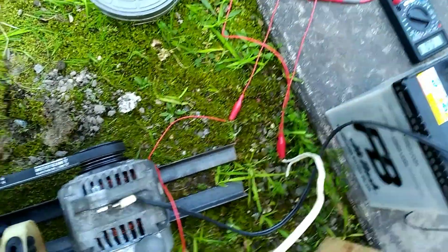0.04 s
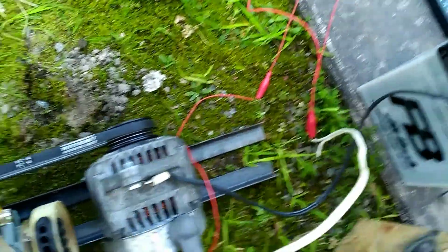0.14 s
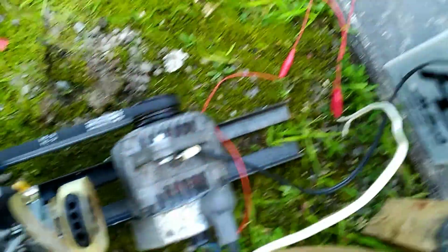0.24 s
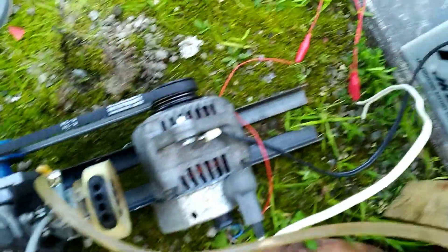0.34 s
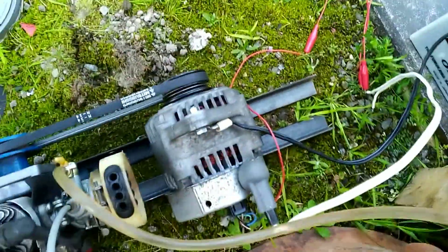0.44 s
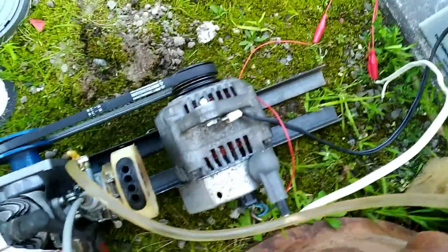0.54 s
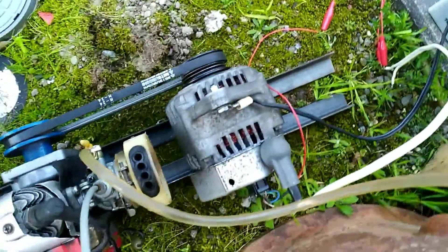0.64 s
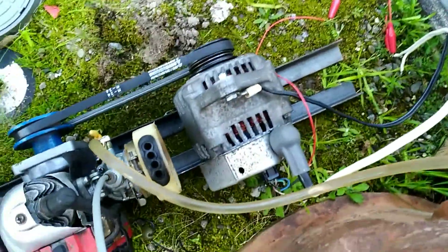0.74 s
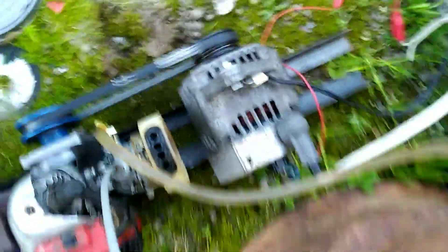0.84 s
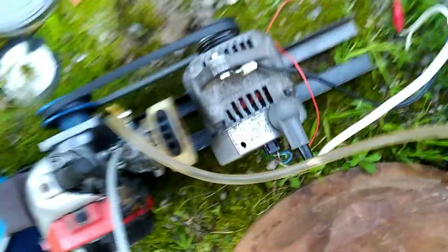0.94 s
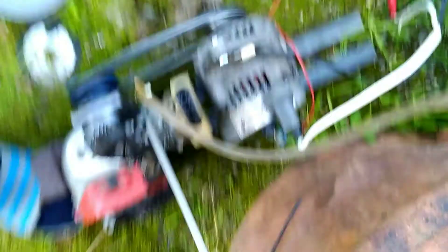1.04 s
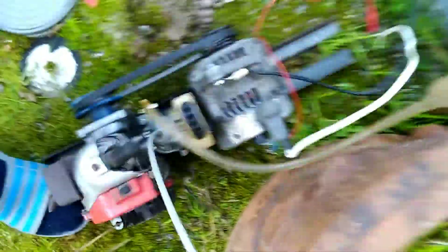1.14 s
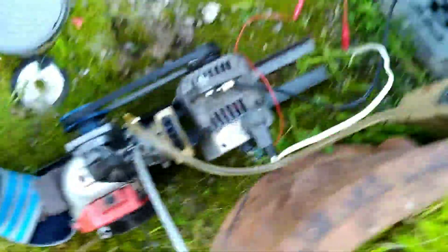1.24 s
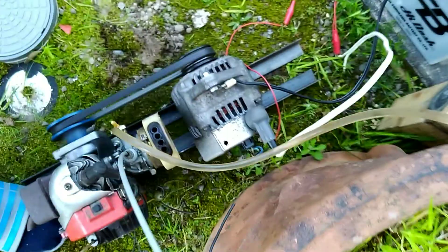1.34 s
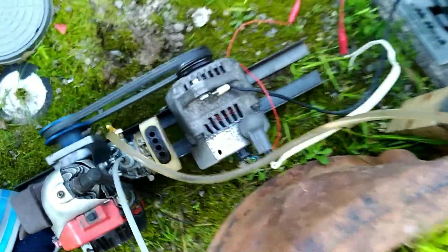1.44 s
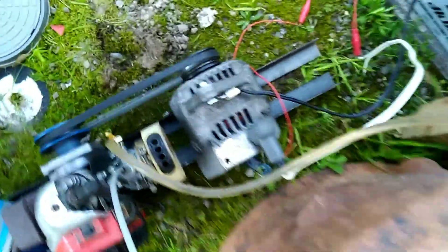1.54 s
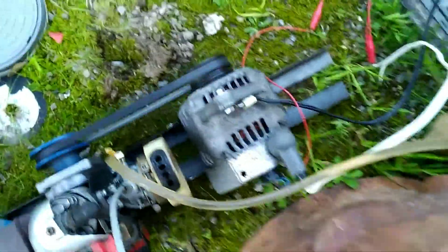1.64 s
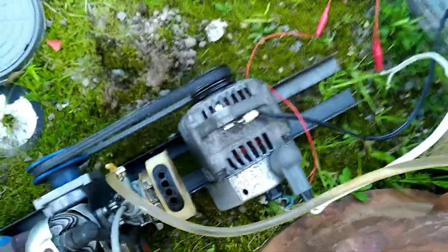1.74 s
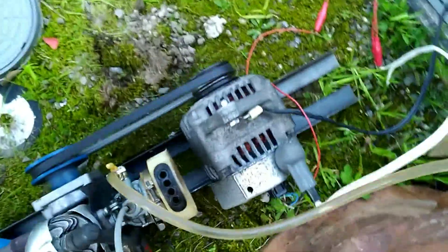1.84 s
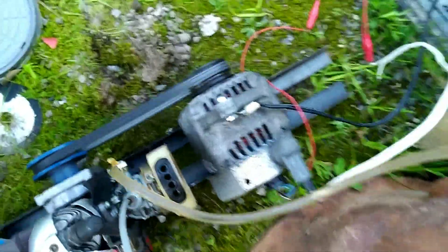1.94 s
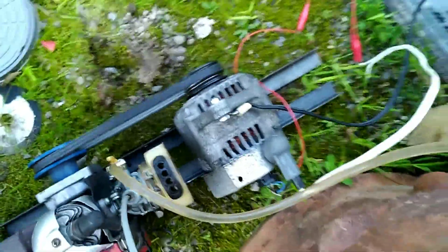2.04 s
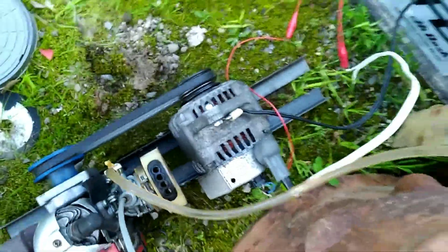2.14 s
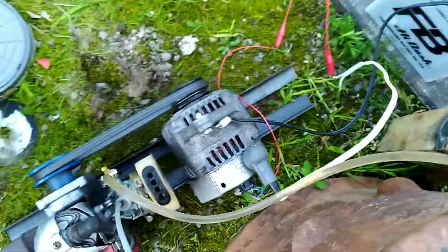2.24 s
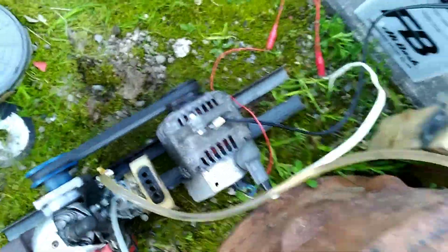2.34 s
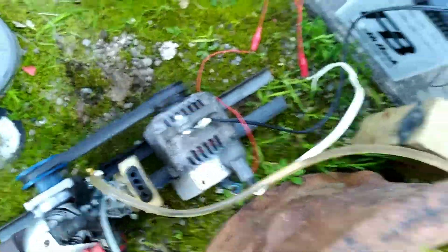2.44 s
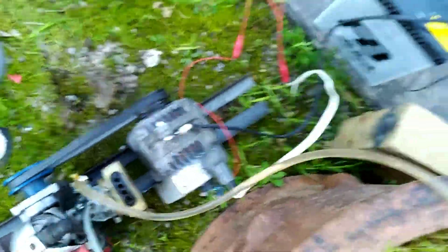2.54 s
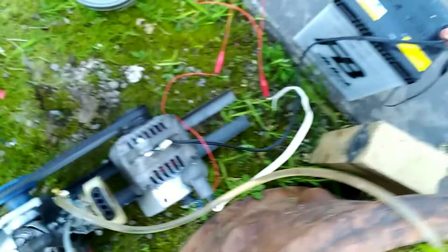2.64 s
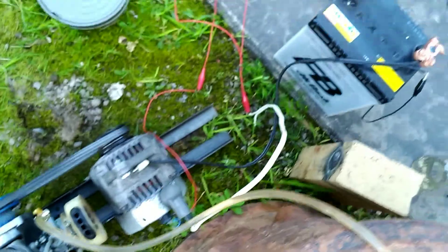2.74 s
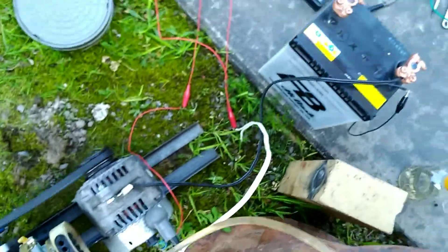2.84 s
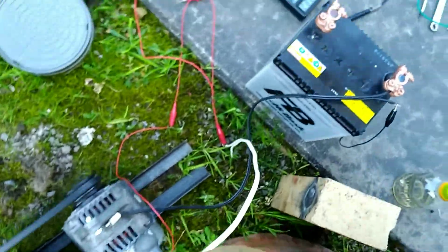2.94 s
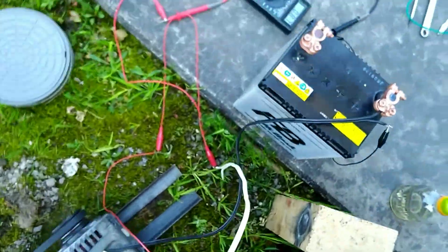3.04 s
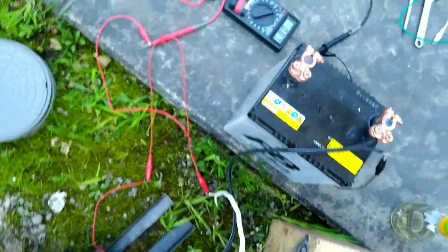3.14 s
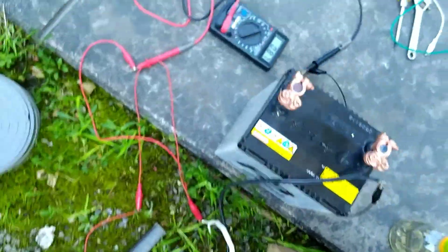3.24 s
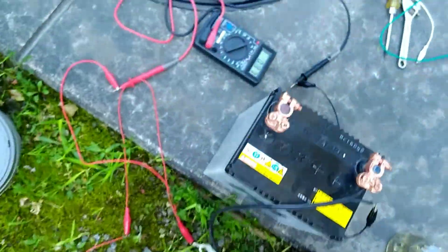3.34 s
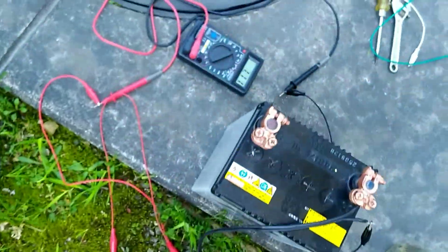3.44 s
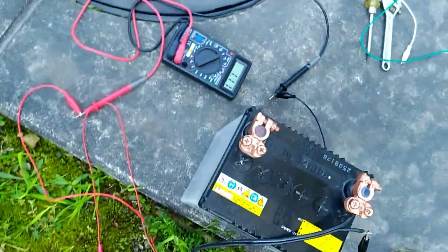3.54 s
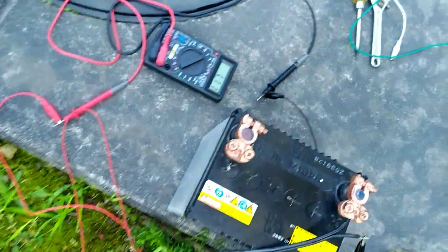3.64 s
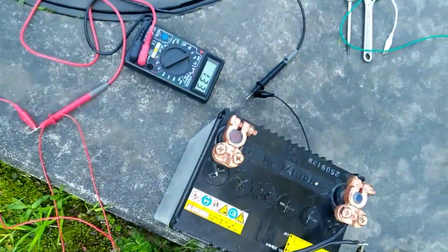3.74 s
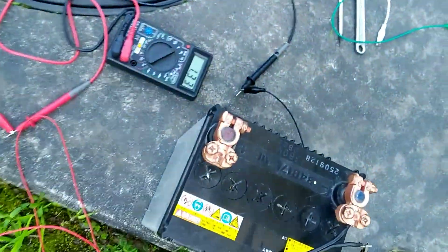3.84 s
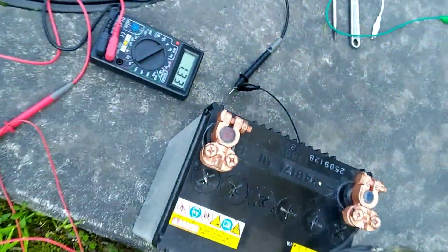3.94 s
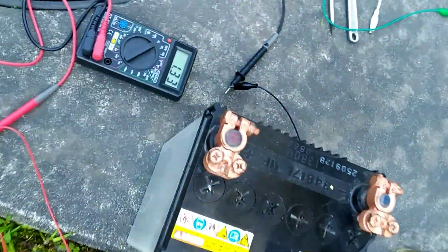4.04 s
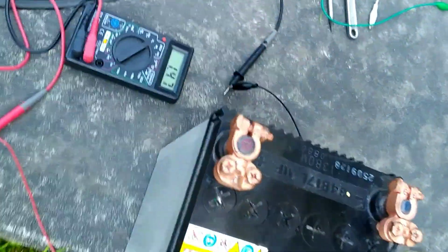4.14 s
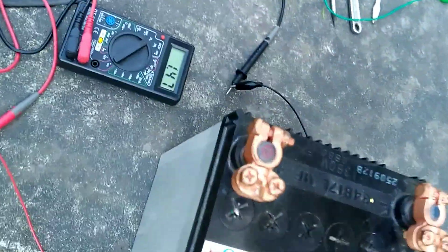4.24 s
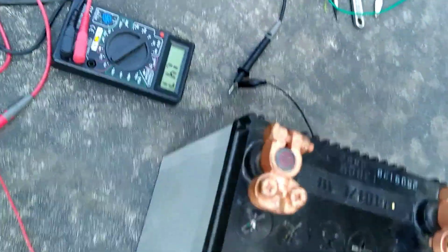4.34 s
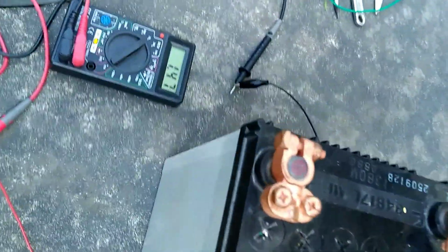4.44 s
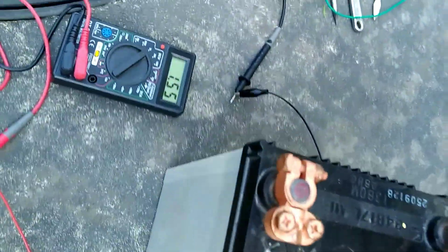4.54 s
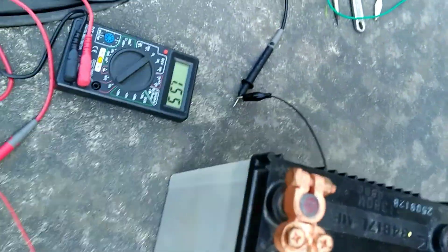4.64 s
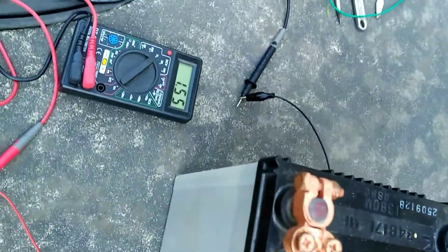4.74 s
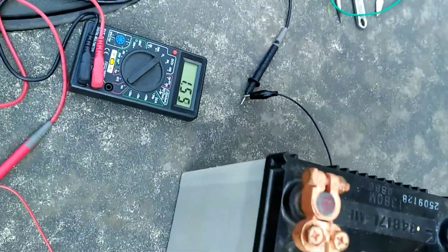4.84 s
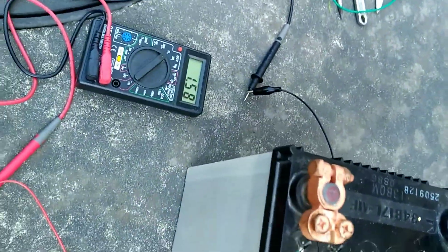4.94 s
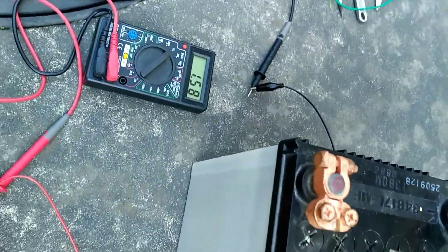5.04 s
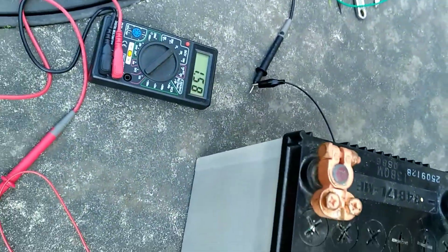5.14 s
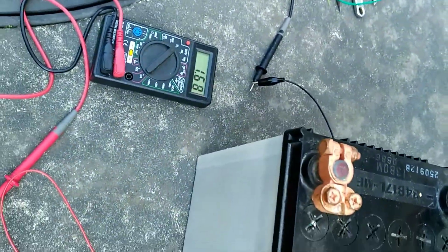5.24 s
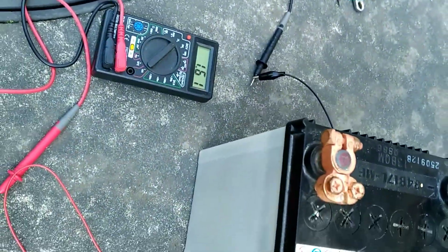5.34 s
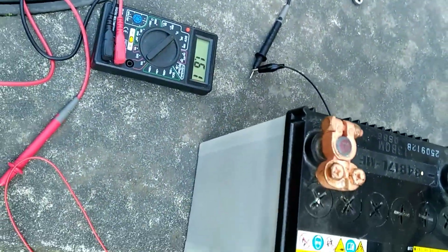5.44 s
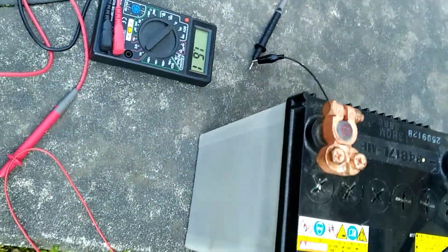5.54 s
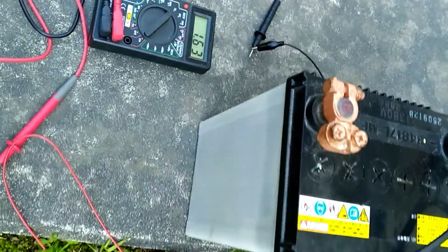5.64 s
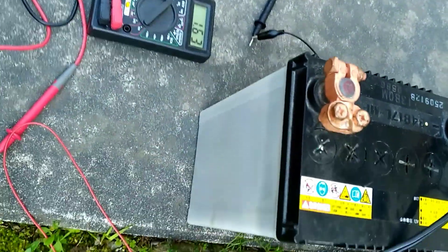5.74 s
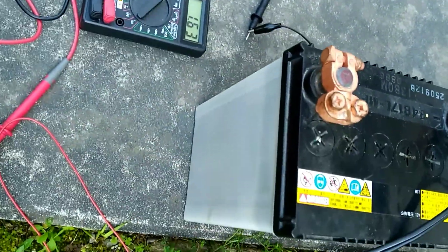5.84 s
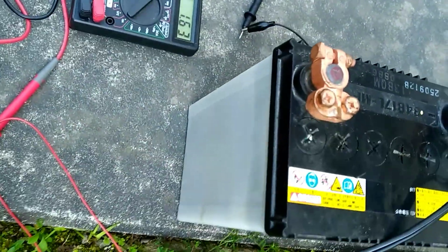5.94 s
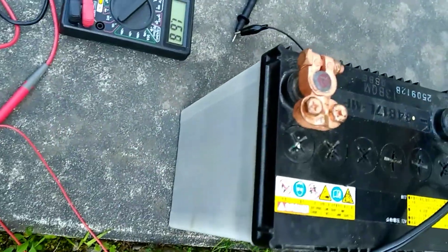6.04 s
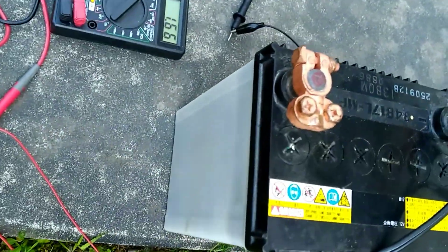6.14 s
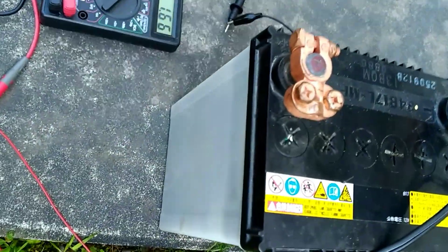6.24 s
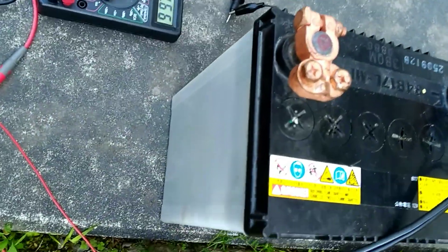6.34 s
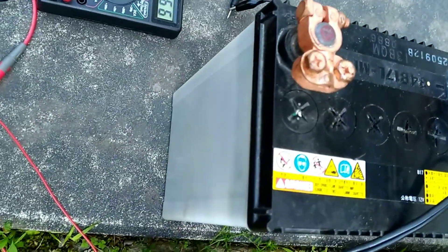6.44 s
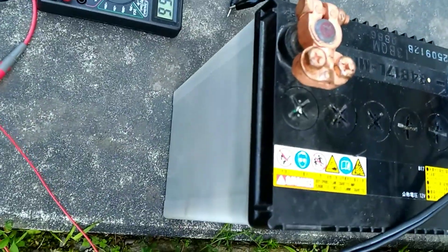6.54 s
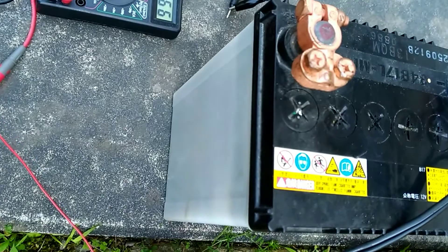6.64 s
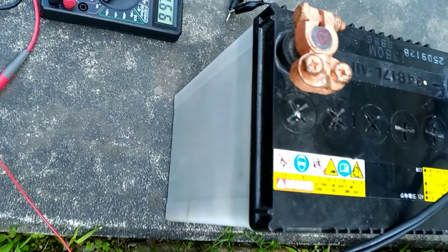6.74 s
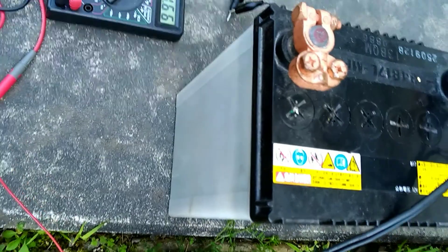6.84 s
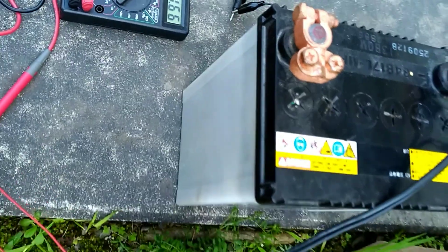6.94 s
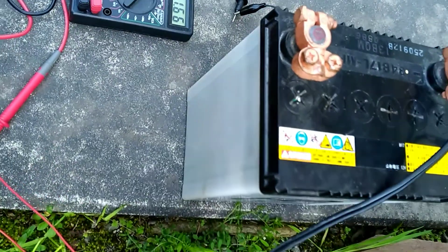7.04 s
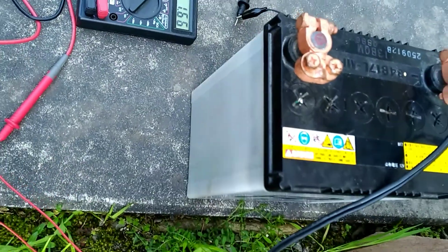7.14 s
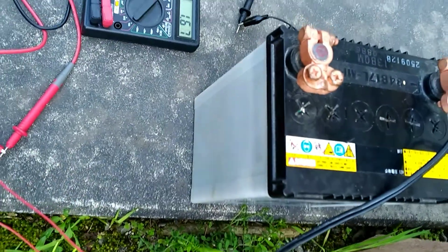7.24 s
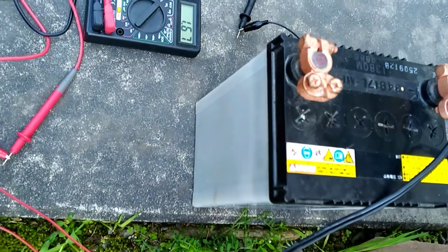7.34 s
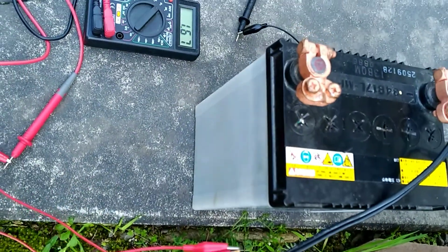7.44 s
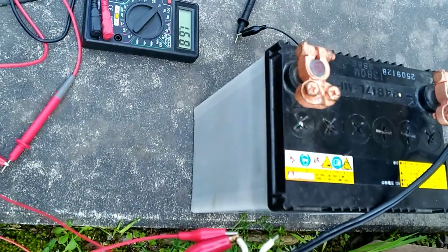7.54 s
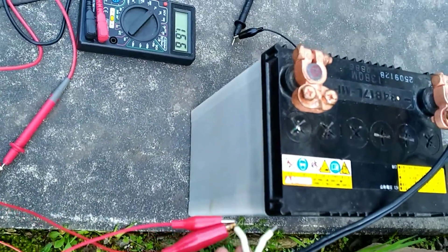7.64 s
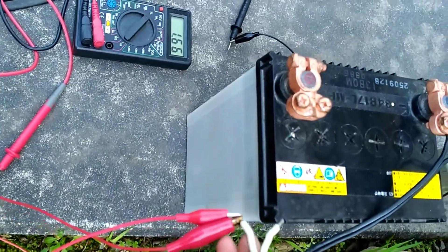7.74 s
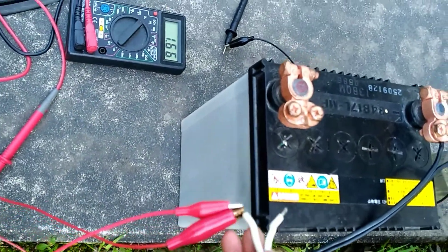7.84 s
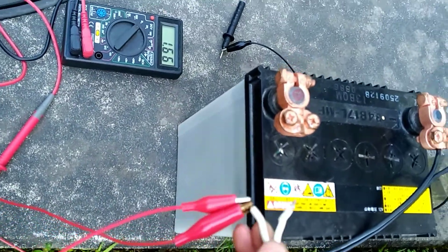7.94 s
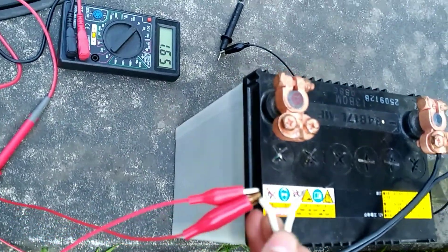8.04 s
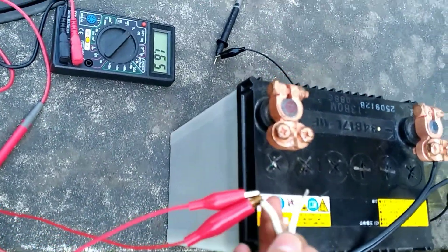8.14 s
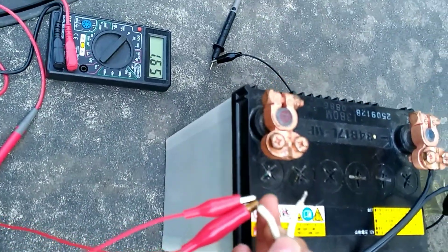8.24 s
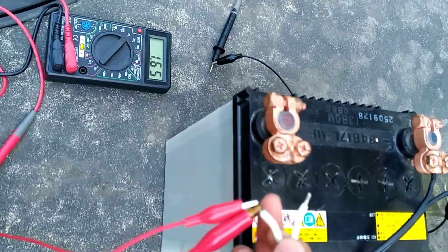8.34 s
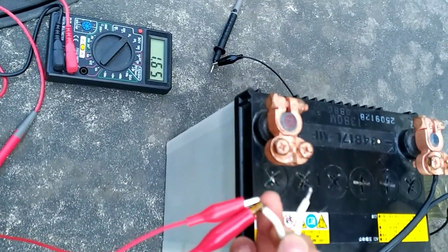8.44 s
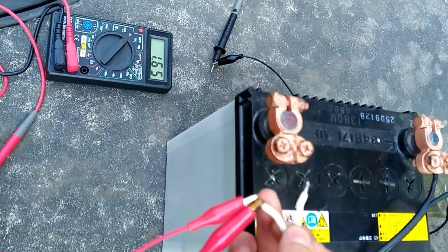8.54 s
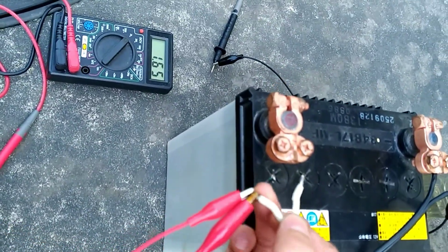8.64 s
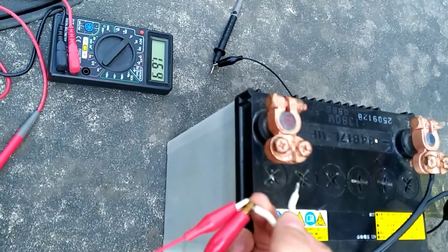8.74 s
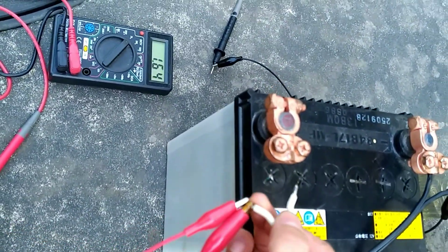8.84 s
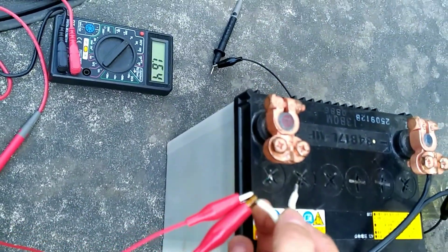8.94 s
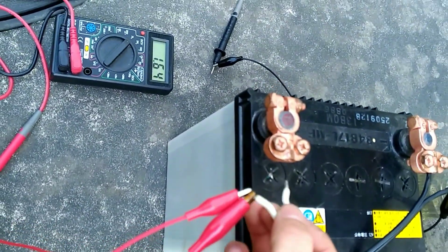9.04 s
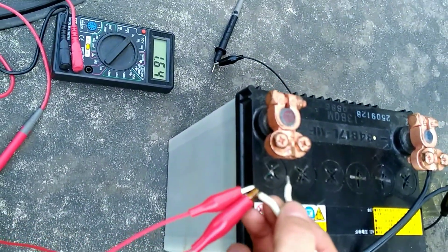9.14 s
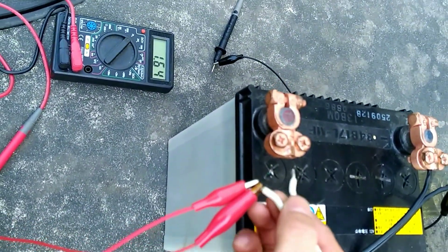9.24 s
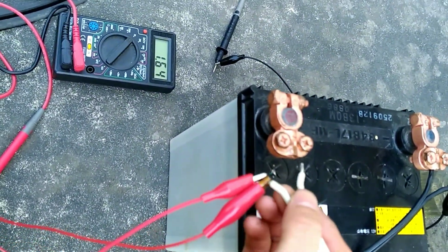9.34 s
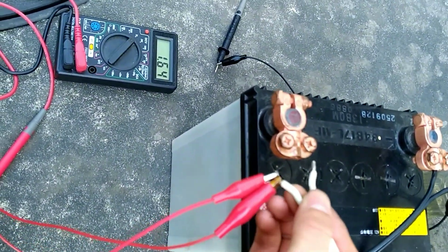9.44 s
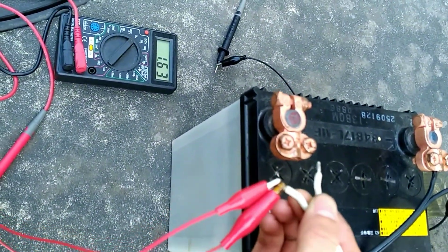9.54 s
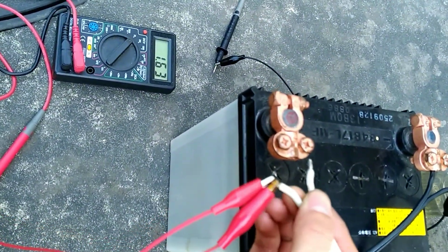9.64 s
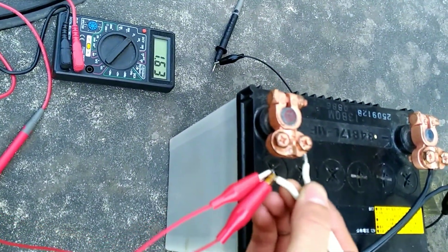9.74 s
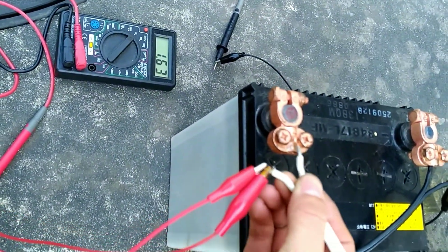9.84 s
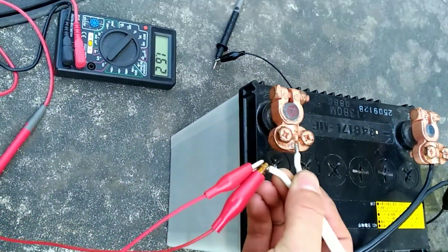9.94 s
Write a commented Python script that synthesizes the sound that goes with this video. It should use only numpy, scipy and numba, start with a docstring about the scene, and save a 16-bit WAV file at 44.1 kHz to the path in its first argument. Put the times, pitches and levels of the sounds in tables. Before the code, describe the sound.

After a quiet moment outdoors, a starter scrapes and a small two-stroke engine catches, rattling lightly, then drones harder under belt load.

```python
"""A faint rustle swells over a far yard murmur, the starter scrapes and low thuds lead into the first firing.
A small two-stroke engine catches on the lawn, an arm's length from a moving phone, and runs light, then belts
a generator under load. The crank settles near 60 turns a second but mostly lights its charge only every second
or third turn: the exhaust pops on those through resonant chambers and pipe, the intake knocks on every turn,
the frame rattles and clanks, and shaped noise makes the hiss of gas and cooling air."""
import sys
import numpy as np
from scipy import signal
from scipy.fft import rfft, irfft
from scipy.io import wavfile
from scipy.ndimage import uniform_filter1d
from numba import njit

SR = 44100
rng = np.random.default_rng(int(sys.argv[2]) if len(sys.argv) > 2 else 0)


def store_pcm(level_fs):
    """Save levels as 16-bit WAV."""
    pcm = np.round(np.clip(level_fs, -1, 1) * 32767).astype(np.int16)
    wavfile.write(sys.argv[1], SR, np.atleast_2d(pcm).T)


N = 441000
TIME = np.arange(N) / SR

# the phone swings round: (time [s], intake left minus right [dB], hiss left minus right [dB])
SWING = [(.8, -1, 1), (1.15, -3, 1), (2.2, -1, 1), (2.7, -0.5, 3), (3.8, 4, 2.5), (5.2, 1.5, 3.5),
         (6.5, 2, 0), (10, 2, 1.5)]


def undb(db):
    """Gain of a level in dB."""
    return 10 ** (np.asarray(db) / 20)


def unit(x):
    """Scale to rms 1."""
    return x / np.sqrt(np.mean(x ** 2))


@njit
def svf(x, hz, width):
    """State-variable band-pass with moving centre and width, gain 1 at the centre."""
    y, b, l = np.empty(len(x)), 0., 0.
    for i in range(len(x)):
        g, k = np.tan(np.pi * hz[i] / SR), width[i] / hz[i]
        v = (b + g * (x[i] + 1e-18 - l)) / (1 + g * (g + k))
        b, l, y[i] = 2 * v - b, l + 2 * g * v, k * v
    return y


def band(x, hz, width_hz):
    """One resonance, steady or moving."""
    return svf(x, hz + np.zeros(len(x)), width_hz + np.zeros(len(x)))


def modes(x, table, pitch=1):
    """Sum of resonances, all scaled in pitch by one ratio."""
    return sum(undb(db) * band(x, hz * pitch, width) for hz, width, db in table)


def clicks(s, size):
    """One click at each time, shared between two samples."""
    at = np.clip(s * SR, 0, N - 2)
    whole = at.astype(int)
    part = at - whole
    return np.bincount(whole, size * (1 - part), N) + np.bincount(whole + 1, size * part, N)


def tail(x, ms):
    """Each click dies away with this time constant."""
    return signal.lfilter([1], [1, -np.exp(-1000 / (ms * SR))], x)


def soften(x, ms):
    """Spread each click into a smooth hump of this length, peak 1."""
    return np.convolve(x, np.hanning(max(round(ms * SR / 1000), 3)), "same")


def coloured(spectrum):
    """Noise of rms 1 with this spectrum."""
    hz, db = np.transpose(spectrum)
    log_hz = np.log(np.arange(1, N // 2 + 2) * SR / N)
    gain = undb(np.interp(log_hz, np.log(hz), db, -90, -90))
    return unit(irfft(rfft(rng.standard_normal(N)) * gain, N))


def grit():
    """Dense small impacts of uneven size, about 6000 a second."""
    struck = rng.random(N) < 6000 / SR
    return rng.standard_normal(N) * struck * undb(1.5 * rng.exponential(size=N))


def flicker():
    """Gain that wanders by about 2 dB, 14 times a second."""
    per_s = 14
    count = int(N / SR * per_s) + 2
    return undb(2 * np.interp(TIME * per_s, np.arange(count), rng.standard_normal(count)))


def ports(near, far, like, lag_ms, pan_db):
    """Two microphone ports: a shared part that reaches the left late, and a second part mixed into the right."""
    like = np.clip(like, 0, 1)
    delay = np.round(lag_ms * SR / 1000).astype(int)
    late = near[np.clip(np.arange(len(near)) - delay, 0, len(near) - 1)]
    pair = np.array([late, like * near + np.sqrt(1 - like ** 2) * far])
    return pair * undb(np.array([pan_db, -pan_db]).reshape(2, -1) / 2)


def curves(table):
    """Columns of a table over time, holding the first row before it and the last row after."""
    s, *columns = np.transpose(table)
    return [np.interp(TIME, s, c) for c in columns]


def ramp(start_s, end_s):
    """0 before the start, 1 after the end, straight between."""
    return np.clip((TIME - start_s) / (end_s - start_s), 0, 1)


def loaded(light, heavy):
    """A value that moves from running light to running under load as the load comes on."""
    return light + (heavy - light) * ramp(3.4, 4.2)


def yard():
    """Far traffic murmur as shaped noise, and a faint electric hum as steady sines."""
    # spectrum of the murmur: (frequency [Hz], relative density [dB per Hz])
    murmur = [(24, -31), (40, 4), (130, -4.5), (512, -20.5), (565, -20), (721, -15), (776, -21),
              (3460, -38), (7400, -46), (14000, -37)]
    # a far electric hum: (frequency [Hz], level [dB])
    hum_tones = [(597.5, -96), (635.2, -84), (662.1, -92), (721.4, -78), (780.6, -98), (839.8, -86)]
    hum = sum(undb(db) * np.sqrt(2) * np.sin(2 * np.pi * hz * TIME) for hz, db in hum_tones)
    return undb(-62.5) * ports(coloured(murmur), coloured(murmur), like=0.59, lag_ms=0, pan_db=2.3) + hum


def rustle():
    """A faint patchy hiss of fine impacts that swells and fades before the start."""
    rise_s, fade_s = .1, 0.11
    swell = TIME / rise_s * np.exp((rise_s - TIME) / fade_s) * flicker()
    return undb(-73) * swell * np.array([unit(band(grit(), 1200, 1500)) for _ in range(2)])


def starter():
    """Short scrapes and clacks as the starter takes hold: bursts of noise in a wide band, each dying away."""
    # scrapes: (time [s], relative level [dB], pitch [Hz], fall by 60 dB [s])
    scrapes = [(0.675, -41, 3140, 0.043), (0.692, -45, 1510, 0.11), (0.714, -20, 1570, 0.047),
               (0.727, -7.5, 1790, 0.038), (0.741, -25, 2020, 0.11), (0.761, -16, 3850, 0.034),
               (0.79, -32, 1520, 0.028)]
    out, t = np.zeros((2, N)), TIME[:SR]
    for s, db, hz, t60 in scrapes:
        attack = np.clip((t - s) / 0.0034, 0, 1)
        fade = attack * undb(db - 60 * np.maximum(t - s, 0) / t60)
        left, right = (unit(band(band(rng.standard_normal(SR), hz, 1.1 * hz), hz, 1.6 * hz)) for _ in range(2))
        out[:, :SR] += 0.39 * fade * ports(left, right, like=0.73, lag_ms=0.13, pan_db=0.57)
    return out


def thuds():
    """Soft low blows as the piston labours over the first compressions: clicks through a low resonance."""
    # blows: (time [s], level [dB])
    blows = [(.76, -36), (0.799, -19.5)]
    hz, width_hz = 163, 140
    s, db = np.transpose(blows)
    blow = band(band(clicks(s, undb(db)), hz, width_hz), hz, 2 * width_hz)
    return ports(blow * undb(db.max()) / np.abs(blow).max(), 0, like=0.82, lag_ms=0, pan_db=2.0)


def turns_so_far():
    """Crank position over time, the running sum of its speed, 0 at the first firing."""
    # crank speed: (time [s], speed [turns per second])
    crank_speed = [(0.8, 16.39), (0.86, 39.8), (0.92, 51.16), (1.05, 59.94), (1.21, 61.95), (1.31, 51.7),
                   (1.39, 61.09), (1.55, 52.9), (1.62, 53.2), (1.69, 55.3), (1.78, 53.7), (3.2, 53.78),
                   (4.1, 57.99), (5.7, 62.73), (6.3, 62.57), (6.7, 62.98), (7.4, 62.07), (8.95, 61.66),
                   (9.3, 60.27), (9.7, 60.51), (10.1, 62.04)]
    first_firing_s = .8017
    total = np.cumsum(curves(crank_speed)[0]) / SR
    return total - np.interp(first_firing_s, TIME, total)


def crank():
    """Turn numbers, which of them fire, and the time of any position; the crank surges and sags between firings."""
    # firing rhythm: (from this crank turn on [turns], from one firing to the next [turns])
    rhythm = [(0, 1), (4, 2), (14, 3), (26, 2), (30, 3), (33, 2), (217, 3), (223, 2), (229, 3), (487, 2),
              (489, 3), (492, 2), (510, 3)]
    surge = .018  # a firing throws the crank ahead [turns per turn squared]
    power_lead = .3  # the surge starts this share of a turn before the pop
    wander = .003  # typical slip of one firing cycle against the next [turns]
    turns = turns_so_far()
    start, every = np.transpose(rhythm)
    turn = np.arange(int(turns[-1]))
    row = np.searchsorted(start, turn, side="right") - 1
    fired = (turn - start[row]) % every[row] == 0
    push = np.append(turn[fired], turn[-1] + every[-1]) - power_lead
    slip = wander * rng.standard_normal(len(push))

    def when(position):
        """Time at which the crank reaches a position."""
        last = np.searchsorted(push, position, side="right") - 1
        ahead = surge * (position - push[last]) * (push[last + 1] - position)
        return np.interp(position - ahead + np.interp(position, push, slip), turns, TIME)
    return turn, fired, when


def exhaust(turn, fired, when):
    """A blast leaves when the port opens; on unlit turns the cylinder sucks back instead, weaker and softer."""
    # lean charges: (crank turn [turns], level change [dB])
    weak_firings = [(207, -6), (227, -3)]
    # the blast comes back from the pipe end: (time [s], delay [ms], share in muffler [1], share in tail pipe [1])
    returns = [(.9, 5.9, 0.29, 1), (1.8, 5.78, 0.25, 0.55), (3.3, 5.9, 0.32, 0.9), (4.2, 6.1, 0.26, 0.28),
               (5.0, 6.14, 0.27, 0.17), (5.8, 6.25, 0.28, 0.033), (9, 6.03, 0.24, 0.17),
               (10, 5.9, 0.19, 0.21)]
    chance = rng.standard_normal((len(turn), 3)).T
    weak_turn, weak_db = np.transpose(weak_firings)
    uneven = undb(.7 * chance[0]) * undb((turn[:, None] == weak_turn) @ weak_db)
    at = when(turn) + .00012 * chance[1]
    lag_ms, muffler_share, pipe_share = curves(returns)
    blast = clicks(at - .0003, fired * uneven)
    back = clicks(at + np.interp(at, TIME, lag_ms) / 1000, fired * uneven)

    # a second unlit turn in a row sucks more weakly
    second_db = -2.5 * ~np.roll(fired, 1)
    slow = np.hanning(round(2 * 0.1 * SR / 1000))
    suck = np.convolve(clicks(at, ~fired * uneven * undb(second_db)), slow / slow.sum(), "same")
    suck = undb(loaded(-7.5, -6.5)) * suck
    # fresh charge pushes through the cylinder
    gulp = clicks(when(turn + 0.4355), np.where(fired, 0.33, 0.34))
    # the port shuts with a small pop
    close = clicks(when(turn + .8), undb(4.5 * chance[2]))
    gas = undb(-46.5) * rng.standard_normal(N)

    def front(flow):
        """Pressure front of a flow through the port, which takes 0.68 ms to uncover."""
        opened = uniform_filter1d(flow + gas, round(0.68 * SR / 1000))
        return band(tail(opened, 0.13), 673, 930)
    low = front(blast + muffler_share * back - suck - loaded(0.79, 0.75) * gulp)
    high = front(blast + pipe_share * back - loaded(0.54, 0.82) * suck - loaded(0.74, 1) * gulp
                 - loaded(.2, .1) * close)
    return muffler(low), tail_pipe(high, front(blast))


def muffler(low):
    """The thump: low chambers ring, a side chamber swallows one note, the bass is fuller while running light."""
    # muffler chambers: (frequency [Hz], width [Hz], gain [dB])
    chambers = [(79, 49, -17), (131.7, 37, 20), (214, 130, 15), (290.5, 92, 15), (327, 7.6, 3.5)]
    low = low - loaded(0.66, 0.07) * band(low, 322.0, 29.0)
    boom = undb(loaded(12, -26)) * band(low, 158, 143)
    return unit(modes(low, chambers) + boom)


def tail_pipe(high, port_blast):
    """The bark: pipe resonances whose notes sag as the load comes on and climb back, and the port's own ring."""
    # pipe notes before they move: (frequency [Hz], width [Hz], gain [dB])
    pipe_modes = [(494.5, 74, 21), (558, 60, 16.5), (666, 34, 24.5), (775, 11, 21), (800, 57, 15.5)]
    # all pipe notes drift: (time [s], pitch ratio [1])
    pipe_pitch = [(1.0, 1.15), (1.8, 0.97), (3.5, 1.074), (4.1, 1.03), (4.7, 0.97), (5.5, 0.99),
                  (10, 1.043)]
    # upper notes at the moving phone:
    # (time [s], third note pitch ratio [1], third note [dB], port notes [dB], fifth note [dB])
    pipe_notes = [(.9, 0.94, 3, 7, 3), (1.4, 0.97, -4, 9, -19), (2.4, 1.0, -0.5, 13, -10),
                  (3.1, 0.99, -4, 7, -8), (3.7, 0.96, -0.5, 5, 3), (4.1, 0.95, 2, 4, 7),
                  (4.4, 0.94, 4.5, -2, 10), (4.9, 0.99, 4, 7, 0), (5.5, 0.99, 2, -5, -2),
                  (7, 0.98, 1, 2, -13), (10, 0.98, 4, 2, 5)]
    # the port itself rings, unheard by the pipe end: (frequency [Hz], width [Hz], gain before the drift [dB])
    port_notes = [(930, 53, 16), (1350, 91, 14)]
    third_ratio, third_db, port_db, fifth_db = curves(pipe_notes)
    pitch_ratios = [1, 1, third_ratio, 1, 1]
    width_ratios = [1, 1, loaded(1.63, 0.96), 1, 1]
    more_dbs = [0, 0, third_db, 0, fifth_db]
    pipe = [(hz * ratio, width * wider, db + more_db) for (hz, width, db), ratio, wider, more_db
            in zip(pipe_modes, pitch_ratios, width_ratios, more_dbs)]
    early = np.roll(high, -round(.1 * SR / 1000))  # the pipe speaks 0.1 ms sooner
    bark = modes(early, pipe, curves(pipe_pitch)[0])
    return unit(bark + undb(port_db) * modes(port_blast, port_notes))


def frame_shake():
    """The unbalanced piston rocks the frame in step with the crank: sines at whole multiples of its speed."""
    # unbalance: (cycles per turn [1], level against the thump [dB])
    unbalance = [(1, -19), (2, -19.5), (4, -21)]
    angle = 2 * np.pi * np.maximum(turns_so_far(), 0)
    return sum(undb(db) * np.sqrt(2) * np.sin(round(order) * angle) for order, db in unbalance)


def intake(turn, fired, when, hz, width_hz):
    """The port slams on every turn, with lighter taps beside it, and each blow rings the air box."""
    # the slam, then lighter taps: (place in the turn [turns], level on a firing turn [dB])
    port_knocks = [(.41, 0.5), (0.82, -13.5), (0.022, -21), (0.78, -32)]
    unlit_db = ~fired * np.interp(when(turn), TIME, loaded(-4.5, 0))
    taps = []
    for share, db in port_knocks:
        chance = rng.standard_normal((len(turn), 2)).T
        at = when(turn + share) + .00003 * chance[1]
        taps.append(clicks(at, undb(db + unlit_db + .9 * chance[0])))
    knock = soften(sum(taps), 0.55)  # the port takes 0.55 ms to slam
    for width_ratio in (0.71, 0.74, 0.79):
        knock = band(knock, hz, width_ratio * width_hz)
    return -unit(knock), taps[0]


def rattle(turn, fired, when, slam, hz, width_hz):
    """Fine impacts shaken loose by slams and firings ring the air box and the frame."""
    # rattling frame: (frequency [Hz], width [Hz])
    frame_modes = [(1800, 100), (2088, 11.6)]
    # how strongly the frame rings: (time [s], lower ring [dB], upper ring [dB])
    frame_ring = [(.85, -8, -2), (1.1, -3, -25), (1.5, -25, -25), (2.5, -7, -21), (3.4, -20, 1),
                  (4.0, 0, 7), (5.7, 3, 12.5), (6.2, -1, -1), (8, -5, -0.5), (10, -2, -3)]
    # rattle shaken loose by each firing: (time [s], strength [1])
    firing_rattle = [(.9, 1.2), (2.5, 0.86), (3.6, 1.4), (4.2, 1.64), (4.8, 1.4), (5.5, 0.88), (10, 0.8)]
    # brightness of the rattle: (time [s], centre [Hz])
    rattle_pitch = [(.9, 1570), (1.8, 1430), (3.2, 1420), (3.7, 1990), (4.3, 1780), (5.5, 1640), (7, 1630),
                    (10, 1570)]
    frame = [(*mode, db) for mode, db in zip(frame_modes, curves(frame_ring))]
    slam_shake = tail(np.roll(slam, round(1.5 * SR / 1000)), 5.1)  # answers the slam 1.5 ms later
    jerk = soften(clicks(when(turn - 0.03), 0.46 + 0.98 * fired), 2.17)
    shake = 0.81 + 0.61 * slam_shake + curves(firing_rattle)[0] * tail(jerk, 2.8) / 40
    box_ratio = loaded(1.03, 1.037)  # the rattle in the air box sits over its knock
    rattles = []
    for grains in [shake * grit() for _ in range(2)]:
        rung = band(grains, box_ratio * hz, 1.38 * width_hz) + modes(grains, frame)
        rattles.append(unit(band(rung, curves(rattle_pitch)[0], 1460)))
    return rattles


def metal(turn, fired, when, slam):
    """Firings, gas spurts and slams shape the hiss and clatter; the hiss sinks in the lull after a firing."""
    # level of the hiss: (time [s], level [dB])
    hiss = [(.8, -44.5), (.85, -33), (.9, -39.5), (1.0, -33.5), (1.3, -43), (1.4, -37.5), (1.5, -37),
            (2.5, -40), (3.0, -45.5), (3.5, -44), (4.2, -36), (5.0, -38.5), (6.6, -37), (7.8, -37.5),
            (10, -36)]
    (sizzle_db,), hiss_pan_db = curves(hiss), curves(SWING)[1]
    change_db = sizzle_db + 36.5  # against the usual hiss
    size = undb(1.6 * rng.standard_normal((len(turn), 2)).T)
    bang = tail(soften(clicks(when(turn), fired * size[0]), 3.6), 1.7) / 45

    # the gas spurt stands out more as the hiss drops
    spurt = loaded(2.1, 0.14) + 0.76 * np.maximum(-change_db, 0)
    spurts = clicks(when(turn + 0.73), size[1] * np.where(fired, 1, 0.73))
    swell = spurt * tail(soften(spurts, 5.7), 2.15) / 110

    # the hiss sinks after the first unlit turn begins
    lulls = soften(clicks(when(turn[fired][:-1] + 1.3), 0.77), 17.0)
    lull = 1 - np.clip(loaded(0.37, 0.26) * lulls, 0, .9)
    puff = 0.63 + 0.065 * tail(slam, 30.0) + loaded(1.14, 0.86) * bang + 0.52 * swell
    puff = puff * flicker() * lull

    out = shell_ring(turn, fired * size[0], when)
    out += undb(-31.5 + change_db) * wash(puff, hiss_pan_db)
    out += clatter(slam, bang, lull)
    return out + undb(sizzle_db) * sizzle(puff, lull, hiss_pan_db)


def shell_ring(turn, size, when):
    """Each firing strikes the shell, which rings near 3 kHz, heard while the phone faces the engine."""
    # shell ring: (time [s], level [dB])
    ring_level = [(0.851, -46), (1.0, -35.5), (1.25, -51), (1.4, -38), (1.7, -38), (2.299, -41.5),
                  (2.6, -46.5), (3.0, -70)]
    ring = unit(band(band(clicks(when(turn + 0.0312), size), 2960, 150), 3050, 270))
    return undb(curves(ring_level)[0]) * ports(ring, 0, like=1, lag_ms=0.31, pan_db=0.73)


def wash(puff, pan_db):
    """Escaping gas and cooling air: shaped noise that swells with the puffs."""
    # gas and air: (frequency [Hz], relative density [dB per Hz])
    wash_spectrum = [(1290, -31), (2200, -51), (2550, -6.5), (3030, -5.5), (3350, -5), (4080, -5.5),
                     (5010, -7), (5810, -1), (7890, -12), (9970, -5), (14300, -15.5)]
    noises = [unit(puff * coloured(wash_spectrum)) for _ in range(2)]
    return ports(*noises, like=.4, lag_ms=.26, pan_db=pan_db)


def clatter(slam, bang, lull):
    """Loose parts jolted by slams and firings: noise bursts in a high band."""
    # clatter: (time [s], level [dB], left minus right [dB])
    clatter_level = [(.8, -46, -8), (1.0, -49, -11), (1.8, -37, -8), (2.5, -44, -6), (3.0, -34.5, 1.5),
                     (3.8, -31, 5.5), (4.6, -30.5, 1.5), (5.8, -31.5, -4), (6.6, -38, -9),
                     (7.4, -36.5, -10.5), (8.2, -35.5, -3), (10, -37.5, -7.5)]
    # pitch of the clatter: (time [s], centre [Hz])
    clatter_pitch = [(.8, 4400), (3.0, 4600), (3.6, 4490), (4.2, 5070), (5.0, 4580), (6.0, 4500),
                     (6.6, 4260), (10, 4680)]
    level_db, pan_db = curves(clatter_level)
    length = round(6 * SR / 1000)  # burst of 6 ms after each slam
    burst = np.convolve(slam, np.ones(length))[:N]
    ticks = tail(slam + 0.6 * np.roll(slam, length * 4 // 5), 0.3)  # at the slam and late in the burst
    jolt = 0.55 * lull + burst + loaded(1.2, .15) * bang + ticks
    pitch_hz = curves(clatter_pitch)[0]
    noises = [unit(band(band(jolt * rng.standard_normal(N), pitch_hz, 1060), 5900, 3600)) for _ in range(2)]
    return undb(level_db) * ports(*noises, like=.5, lag_ms=.28, pan_db=pan_db)


def sizzle(puff, lull, pan_db):
    """Fine impacts near 10 kHz that follow the puffs, with a higher crackle over them."""
    # highest crackle: (time [s], level against the sizzle [dB])
    crackle_level = [(.8, 0), (1.5, -1), (2.7, 1), (3.5, -7), (4.5, -4), (6, -6), (10, -17)]
    crackle_gain = undb(curves(crackle_level)[0])
    noises = []
    for sparks in [(0.88 * flicker() * lull + puff) * grit() for _ in range(2)]:
        crackle = unit(band(band(sparks, 10800, 1200), 13000, 1700))
        noises.append(unit(band(band(sparks, 9690, 1170), 9600, 2400)) + crackle_gain * crackle)
    return ports(*noises, like=.4, lag_ms=.39, pan_db=pan_db)


def clanks():
    """A loose part strikes the frame: each blow rings two close notes and dies fast."""
    # blows: (time [s], relative level [dB], upper note [Hz])
    strikes = [(1.1448, -17, 1780), (3.8801, -19, 1920), (4.0357, -16, 1970), (4.1395, -15, 2055),
               (4.8479, -21, 2080), (4.9482, -13, 2070)]
    t60_s = 0.059
    out, t = np.zeros(N), TIME[:SR // 10]
    for s, db, hz in strikes:
        ring = np.sin(2 * np.pi * hz * t) + 0.8 * np.sin(2 * np.pi * 0.86 * hz * t)
        fade = np.clip(t / 0.00073, 0, 1) * undb(db - 0.5 - 60 * t / t60_s)
        out[int(s * SR):int(s * SR) + len(t)] += ring * fade
    return ports(out, 0, like=0.99, lag_ms=.03, pan_db=3)


def scene():
    """Engine parts as the two ports hear them, over the yard."""
    # exhaust as the phone moves about: (time [s], thump level [dB])
    exhaust_level = [(.8, -38), (.85, -27.5), (1.3, -28), (1.8, -27.5), (2.6, -29), (3.4, -29),
                     (4.2, -25.5), (5.0, -26.5), (5.8, -24), (7.0, -24.5), (10, -25.5)]
    # intake: (time [s], knock level [dB], air box pitch [Hz])
    intake_knock = [(.8, -46, 920), (.85, -50, 980), (.9, -31.5, 930), (1.15, -28, 1160),
                    (1.5, -30.5, 1040), (1.8, -34.5, 1170), (2.6, -31.5, 1270), (3.4, -33, 1290),
                    (3.8, -30.5, 1530), (4.2, -28.5, 1550), (5.8, -26, 1484), (7.4, -27, 1533),
                    (10, -28, 1580)]
    # as the phone turns, the left port hears the engine late: (time [s], lag before fixed offsets [ms])
    left_lag = [(.8, 0.043), (1.7, 0.054), (2.8, -0.11), (3.6, -0.14), (4.3, -0.06), (5.1, 0.076),
                (5.8, 0.074), (6.6, 0.11), (8, 0.094), (10, 0.079)]
    # deepest bass: (time [s], level against the thump [dB])
    bass_level = [(.9, 1.5), (2.4, 2.5), (3.2, -3), (4.1, 0.5), (6, -2), (8, -0.5), (10, -3)]
    (thump_db,), (knock_db, box_hz), pan_db = curves(exhaust_level), curves(intake_knock), curves(SWING)[0]
    (lag_ms,) = curves(left_lag)
    catching_db = -6 * (1 - ramp(0.8, 0.99))  # bark and, slightly, rattle swell in over the first firings
    bark_db = thump_db + loaded(0.5, -3) + catching_db
    rattle_db = thump_db + loaded(1.5, -2.5) + 0.079 * catching_db
    box_width_hz = loaded(900, 960)

    turn, fired, when = crank()
    thump, bark = exhaust(turn, fired, when)
    knock, slam = intake(turn, fired, when, box_hz, box_width_hz)
    rattles = rattle(turn, fired, when, slam, box_hz, box_width_hz)
    thump = thump + frame_shake()
    thump = thump + (undb(curves(bass_level)[0]) - 1) * band(thump, 62, 70)

    engine = undb(thump_db) * ports(thump, 0, like=0.81, lag_ms=lag_ms + 0.1, pan_db=1.47)
    engine += undb(bark_db) * ports(bark, np.roll(bark, 300), like=0.92, lag_ms=lag_ms + 0.019, pan_db=0.96)
    engine += undb(knock_db) * ports(knock, 0, like=0.78, lag_ms=lag_ms, pan_db=pan_db + 4.5)
    engine += undb(rattle_db) * ports(*rattles, like=0.32, lag_ms=lag_ms, pan_db=pan_db)
    engine += metal(turn, fired, when, slam)
    turning = TIME > .775  # the crank starts to move
    return yard() + rustle() + starter() + thuds() + engine * turning + clanks()


def record(dry):
    """The phone cuts the deep bass below 50 Hz and the top above 14350 Hz."""
    thin = signal.sosfilt(signal.butter(4, 50, "high", fs=SR, output="sos"), dry)
    return signal.sosfilt(signal.ellip(10, .2, 80, 14350, fs=SR, output="sos"), thin)


dry = scene()
out = record(dry)
store_pcm(out)
```